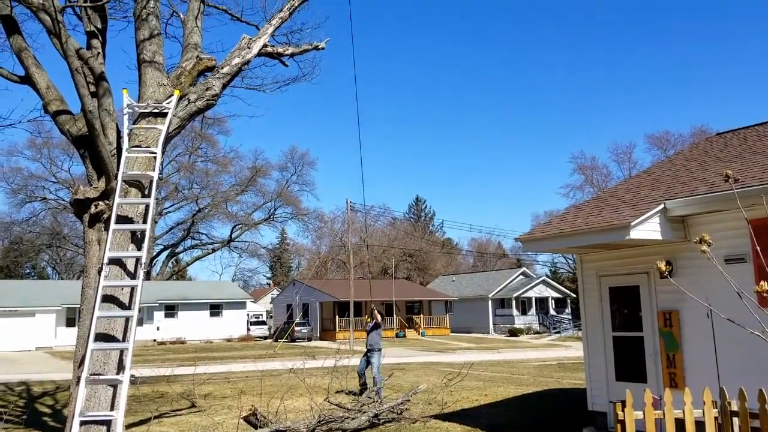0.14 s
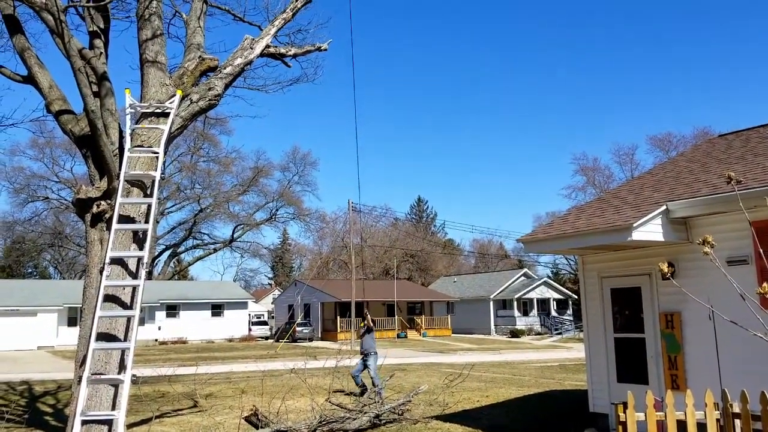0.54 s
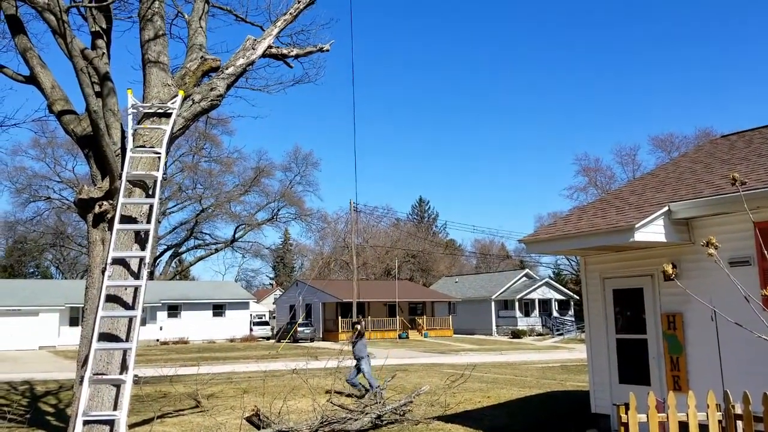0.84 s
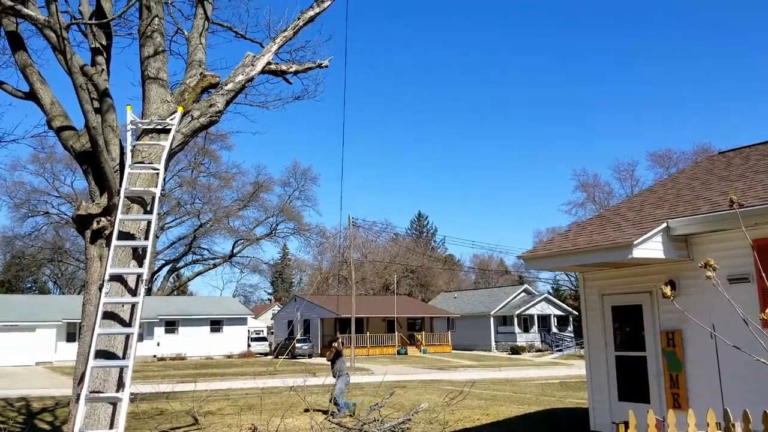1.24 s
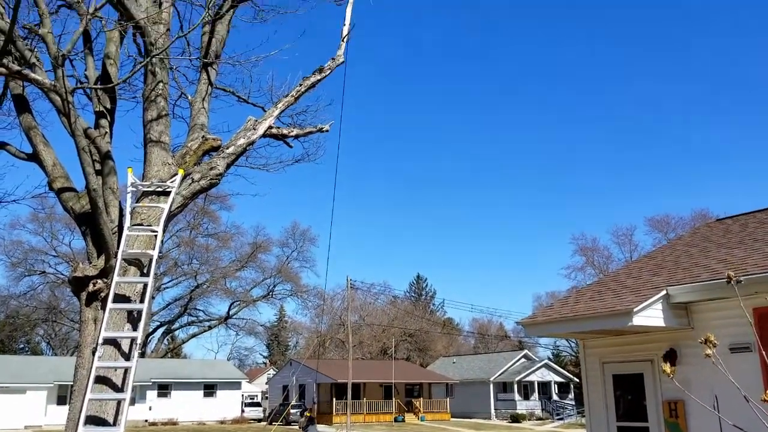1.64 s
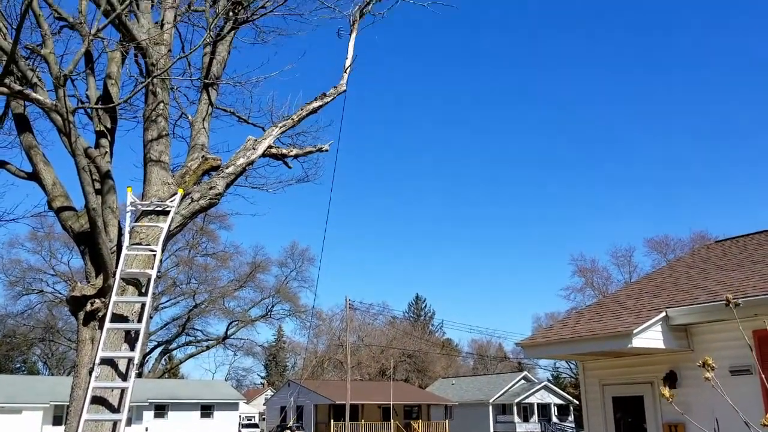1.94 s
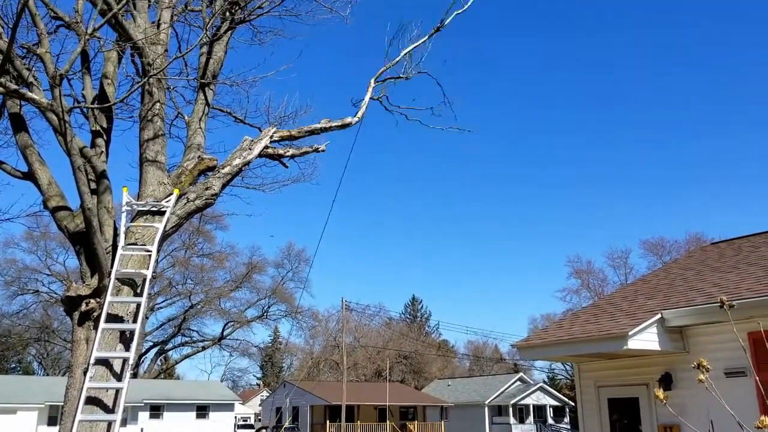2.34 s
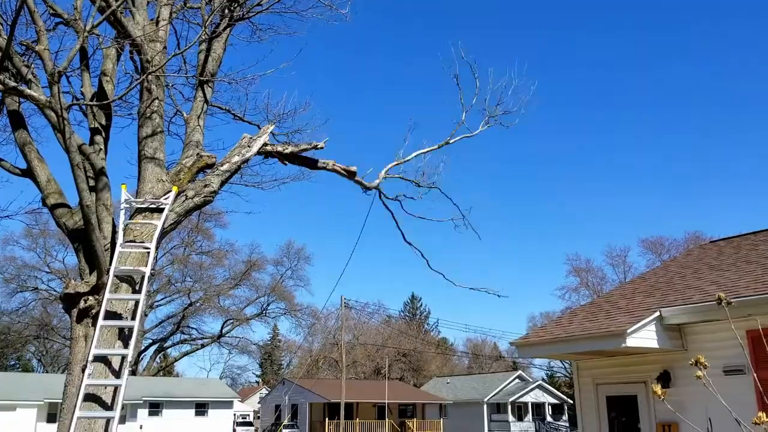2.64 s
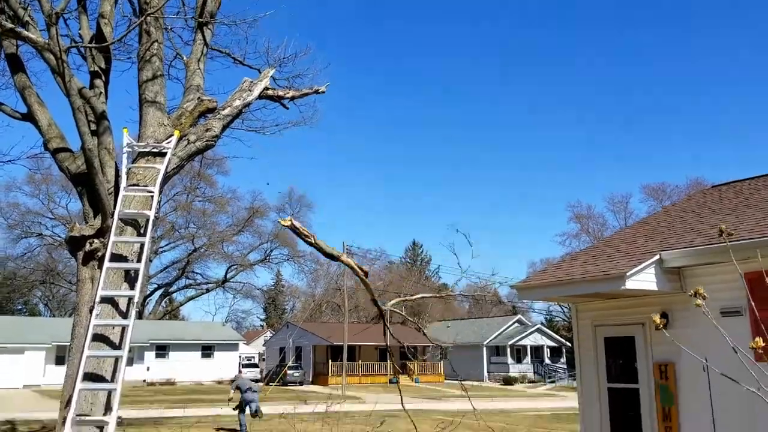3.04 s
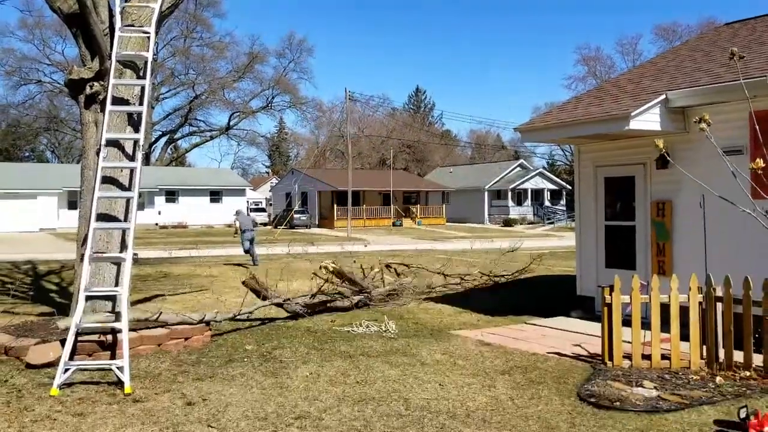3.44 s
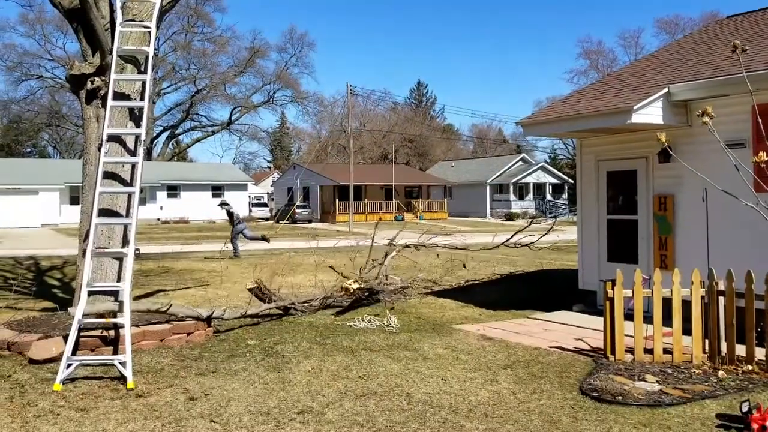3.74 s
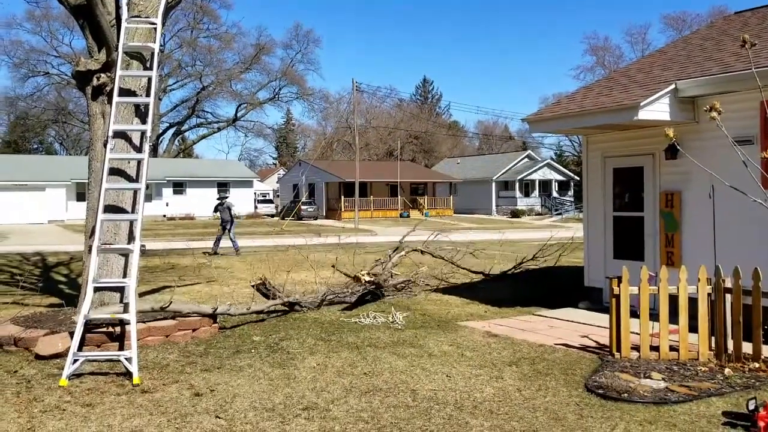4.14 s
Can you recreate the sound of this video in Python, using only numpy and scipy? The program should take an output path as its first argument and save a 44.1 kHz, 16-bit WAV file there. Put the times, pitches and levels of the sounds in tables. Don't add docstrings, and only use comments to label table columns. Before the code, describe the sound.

A stereo phone recording in an open, breezy yard. A hoarse jay calls faintly at the start over distant street noise, hiss, a far small engine idling and low wind buffets. From about 0.5 seconds thick wood cracks to the left, with sharp splintering bursts near 0.6, 0.75 and 0.9 and smaller cracks until 1.1. A lull follows, then the limb snaps off hard at 1.85, bright and ringing, with short reflections from the crown and yard. From 2 to 3 seconds it falls with sparse twig clicks and light rustle; the jay calls again more faintly near 2.65 and a small bird whistles softly around 2.8 to 3.0. At 3.1 it crashes onto the lawn: dense hollow knocks, shattering twigs and scraping brush, loudest until 3.5. Rebounding knocks and a tiny woody squeak come around 3.8 to 4.0, then scattered ticks as wind rises towards the end at 4.3.

```python
import sys
import numpy as np
from scipy import signal
from scipy.fft import rfft, irfft
from scipy.io import wavfile
from scipy.ndimage import uniform_filter1d

SR = 44100
rng = np.random.default_rng(int(sys.argv[2]) if len(sys.argv) > 2 else 0)


def dump_mix(stems):
    frames = np.atleast_2d(stems).T
    limited = np.clip(frames, -1, 1)
    pcm = np.round(limited * 32767).astype(np.int16)
    wavfile.write(sys.argv[1], SR, pcm)


def natural_amplitude(level_db):
    exponent = np.asarray(level_db, float) / 20
    return 10 ** exponent


N = 189674
LEFT_RIGHT = np.array([[1], [-1]])
LIMB_PAN_DB, LANDING_S = -3.5, 3.05

# (time [s],
# peak level [dB], ring pitch [Hz], splinters over ring [dB], thud over ring [dB])
CROWN_KNOCKS = [(0.488, -26.5, 658, -3, -24.5), (0.589, -36, 700, -3, -3), (0.6185, -11.5, 648, -3, -20.5),
                (0.7555, -11.5, 652, -8.5, -11), (0.769, -26.5, 550, -17, 1), (0.8955, -4, 613, -4.5, -7.5),
                (0.982, -21, 1080, -7.5, -28), (1.009, -18.5, 677, -16.5, -20), (1.0225, -22, 1312, 7, -8),
                (1.0773, -34, 460, -8, -0.5), (1.833, -25, 1197, -7.5, -21), (1.859, -6, 640, -6, -28.5),
                (1.884, -15, 635, -3.5, -6), (2.008, -26.5, 712, -7, -19), (2.045, -25, 454, -6.5, -23),
                (2.108, -28.5, 634, -9.5, -14), (2.18, -32, 649, -8, -12), (2.607, -35, 1216, -6, -15),
                (2.648, -44, 660, -2, -12.5)]
# (time [s], peak level [dB], ring pitch [Hz], splinters [dB], thud [dB])
LAWN_BLOWS = [(3.084, -16.5, 528, -20, -31), (3.104, -17, 557, -20, -17), (3.125, -14, 1084, -8.5, -40),
              (3.137, -29, 519, -1, -21), (3.167, -38, 526, 8, -20), (3.215, -8.5, 632, -6.5, -46),
              (3.229, -15.5, 713, -4, -27), (3.248, -32, 708, -3, -14), (3.277, 0.5, 773, -26, -18),
              (3.296, -16, 329.4, -18, -39), (3.337, -19, 661, -7.5, -22), (3.366, -14.5, 685, -11, -10),
              (3.381, -4, 319.8, -18, -35), (3.402, -10.5, 422, -13.5, -7), (3.452, -11, 843, -33, -6),
              (3.468, -16, 336, -22, -21), (3.485, -27.5, 253.5, -13, -12), (3.518, -48, 845, -19, -10),
              (3.605, -28, 285, -5.5, -2.5)]
# (time [s], peak level [dB], ring pitch [Hz], splinters [dB], thud [dB])
REBOUNDS = [(3.732, -31.5, 720, -13, -11), (3.801, -22, 254, -20, 0), (3.828, -22, 730, -25, 1.5),
            (3.848, -30, 372, -22, -3), (3.889, -19, 333, -25, -33), (3.899, -11, 494, -23, -34),
            (3.917, -17.5, 322, -18, -32), (3.941, -18.5, 517, -21, -34), (3.962, -23.5, 498, -17.5, -7),
            (3.988, -34.5, 483, -7.5, -20), (4.088, -36, 924, -10.5, -16), (4.256, -35, 316, -16, -21.5)]
# (time [s], peak level [dB], ring pitch [Hz], splinters [dB], thud [dB])
SECOND_PIECES = [
    (1.860, -14, 560, -25, -34),
    (3.801, -18.5, 784, -26, -34),
    (4.259, -30.5, 740, -19, -28),
    (1.9, -41, 1580, 3, -27.5),
    (3.893, -15, 752, -16, -28),
]
TEAR_CYCLES = 2.6
LEAD_CYCLES = 2.6

# (time [s], peak level [dB], pitch [Hz], T60 [s], left minus right [dB])
CLEAR_RINGS = [(1.8593, -7, 425, .07, -3.5), (1.8593, -4, 600, .055, -4), (1.8593, -11, 1050, .035, -3.5),
               (1.8593, -10, 1750, 0.043, -4), (1.865, -16.5, 1270, 0.048, -3),
               (1.8664, -10, 425, .035, -4), (1.864, -20, 2336, .036, -3.5),
               (1.8845, -22.5, 1220, .04, -3.5), (1.8245, -24, 1100, .007, -4),
               (1.8343, -6, 1250, .006, -3.5), (.9835, -7, 1150, .007, -3.5), (.978, -30, 2000, .03, -3),
               (1.0243, -17, 4300, .01, -4), (1.029, -13, 1500, .01, -3.5), (1.0772, -17, 1600, .007, -3),
               (0.8955, -12.5, 400, .06, -3.5), (0.8955, -14.5, 210, 0.067, -3),
               (1.942, -32.5, 2100, .04, -2), (2.652, -39, 1720, 0.02, -4), (2.733, -49, 1750, 0.027, -2),
               (3.28, -18, 780, 0.037, -3), (3.801, -27.5, 1150, .05, -3), (3.892, -25.5, 1150, .04, -3),
               (3.905, -36, 2400, 0.07, -3), (3.9, -41, 3500, .06, -3), (3.943, -28, 2500, 0.017, -7),
               (3.9895, -30, 2570, .015, -3), (3.958, -37, 4350, .02, -5), (4.256, -32.5, 1000, .03, -3),
               (1.0243, -1, 1450, .007, -3.5), (1.0246, -7, 2500, .008, -3.5),
               (1.8343, -23.5, 430, 0.037, -4.5), (1.8845, -22, 620, 0.043, -3.5),
               (1.868, -18, 800, .05, -3.5), (1.8845, -25.5, 2650, .04, -3), (.6715, -31, 3200, .012, -2.5),
               (.7, -31, 2200, .015, -2), (3.0902, -12, 4800, .012, -7.5), (3.17, -23, 2450, 0.042, -5)]

# (time [s], peak level [dB], ring pitch [Hz], left minus right [dB])
CUT_FIBRES = [(0.4854, -38.5, 3400, -18), (0.4902, -20.5, 3130, -9.5), (0.5467, -41, 2960, -8),
              (0.5867, -27, 3700, -7), (0.6195, -10, 2760, -5), (0.6715, -33, 3280, 2),
              (0.7555, -17, 2700, -7), (0.7709, -24, 4000, -16), (0.8978, 0, 2820, -6),
              (0.9464, -20, 2980, 3), (0.9834, -15, 2750, -3.5), (1.0005, -26.5, 2740, -2.5),
              (1.0244, -9, 2690, -7.5), (1.078, -24, 2390, -2.5), (1.2758, -45, 2376, -15.5),
              (1.7111, -50, 11700, -19.5), (1.8248, -22, 4520, -13), (1.8338, -17, 11180, -13.5),
              (1.8599, -0.5, 3300, -8), (1.8862, -4, 4630, -5.5), (1.9375, -30, 2315, -1),
              (1.9785, -30, 2750, 0)]
# (time [s], peak level [dB], ring pitch
# [Hz], left minus right [dB])
FALLING_AND_LATE_TWIGS = [(2.0502, -43, 2890, 2), (2.088, -42.5, 4640, 12), (2.1273, -38.5, 2630, -5),
                          (2.1887, -32, 11000, -5), (2.3545, -47.5, 3720, -12), (2.3711, -34, 3160, -6),
                          (2.4264, -37.5, 6600, -14.5), (2.4706, -42.5, 2646, -14), (2.4962, -34.5, 2550, -14),
                          (2.5337, -48, 5630, -16), (2.61, -38, 2640, -9), (2.6479, -29, 11200, -5),
                          (2.7322, -36.5, 11900, -13), (2.945, -40.5, 2560, -9), (2.972, -43, 3750, -6),
                          (2.9811, -39, 3750, -8.5), (3.0435, -48, 7900, -14), (3.0652, -46, 3120, -6.5),
                          (4.0264, -57, 2860, -4), (4.0711, -43, 2660, -15), (4.1006, -41.5, 2650, -17),
                          (4.153, -35.5, 7000, -25), (4.1649, -30, 10300, -6), (4.2332, -34, 3550, -14),
                          (4.2755, -34.5, 4900, -10)]
# (time [s], peak level [dB], ring pitch [Hz], left minus right [dB])
SHATTERED_TWIGS = [(3.0901, -0.5, 3300, -7), (3.1288, -8.5, 2900, -12), (3.1532, -17.5, 4300, -12),
                   (3.1697, -16.5, 2570, -4.0), (3.1971, -26.5, 3000, -13), (3.2215, -14, 5100, -19),
                   (3.2794, -17, 2450, -12.5), (3.3054, -20, 5000, -26), (3.3223, -11.5, 5570, -8),
                   (3.3394, -22.5, 3030, -24), (3.3654, -26, 2800, -18), (3.3913, -1, 5000, -5.5),
                   (3.4256, -11, 4800, -7), (3.4361, -12, 4930, -16), (3.478, -29.5, 3610, -28),
                   (3.496, -19.5, 2840, -14), (3.5503, -16.5, 11300, -5), (3.5564, -18, 4530, -6.5),
                   (3.5843, -23, 10600, -4), (3.6047, -29, 2980, -26), (3.6514, -39, 2500, -3.0),
                   (3.699, -23.5, 4100, -8), (3.7434, -35, 9200, -21), (3.7903, -32, 11900, -1.5),
                   (3.8028, -15, 9800, -16.5), (3.8332, -19.5, 5200, -7), (3.8781, -39, 2750, -7),
                   (3.9065, -32, 5330, -17), (3.9434, -40, 2590, -11), (3.9888, -41, 2400, -1)]
# (time [s], peak level [dB], centre [Hz], left minus right [dB])
TWIG_TICKS = [(3.212, -24, 3200, -10), (3.217, -24, 5000, -8), (3.2245, -20, 8500, -8),
              (3.233, -19.5, 5300, -8), (3.237, -17.5, 3000, -8), (3.2385, -18, 7500, -11),
              (3.242, -22, 10500, -4), (3.252, -21, 12000, -4), (3.259, -22.5, 8500, -6),
              (3.2595, -24.5, 5500, -6), (3.281, -24, 9000, -5), (3.302, -24, 9500, -5),
              (3.305, -23.5, 12500, -4), (3.368, -24, 11500, -4), (3.385, -22, 11000, -4),
              (3.402, -20.5, 4000, -6), (3.407, -19, 12000, -4), (3.408, -20.5, 8500, -5),
              (3.444, -17, 12500, -4), (3.449, -23, 9500, -5), (3.455, -22, 12000, -4),
              (3.4795, -22, 12000, -4.5), (3.4805, -27.5, 2520, -6), (3.4905, -27, 11500, -4),
              (3.497, -22, 12500, -4), (3.498, -25.5, 2000, -5), (3.512, -26, 10500, -6),
              (3.513, -28, 5500, -5), (3.527, -30, 8050, -5), (3.54, -35, 8000, -5),
              (3.568, -33, 11000, -5), (3.58, -36, 9000, -4), (3.803, -23, 5520, -8),
              (3.912, -31, 5420, -11), (3.927, -31, 5300, -10), (.951, -35, 9500, -2),
              (1.003, -32, 12000, -2.5), (1.011, -29, 1900, -4), (1.861, -15, 8500, -1.5),
              (3.426, -17, 11500, -4), (3.551, -24, 11980, -4), (3.586, -28, 12000, -4),
              (3.712, -40, 10500, -4), (3.851, -35, 12000, -3), (3.904, -34.5, 10990, -3),
              (3.915, -35, 9500, -3), (1.8875, -21, 8500, -1.5), (3.941, -40, 11500, -3),
              (4.086, -43, 5170, -8), (4.165, -36, 8500, -5)]
TICK_S, TICK_SPREAD = .0016, .11

# (time [s], level [dB])
RUBBING = [
    [(1.9, -50), (2.03, -52.5), (2.22, -60.5), (2.7, -62.5), (3.05, -84)],
    [(3.05, -70), (3.14, -47), (3.26, -30.5), (3.45, -30.5), (3.59, -47.5), (3.8, -49.5), (4.3, -59)],
]
HARD_DB, THICK_SHARE, TWIG_SHARE = -33.5, 1, 1.29
CLUMP_DB = 3.8
# (time [s], level [dB])
SQUEAK = [
    (3.895, -59),
    (3.905, -44.5),
    (3.94, -45),
    (3.975, -71),
]
SQUEAK_HZ = 5330
# (time [s], length [s], level [dB], lowest [Hz], highest [Hz])
DRAGS = [
    (2.6, .07, -50, 500, 3600),
    (3.058, .025, -47, 1500, 14000),
    (3.078, .014, -38, 1000, 6000),
    (1.706, .03, -58, 3500, 14000),
    (2.08, .025, -52, 11500, 15500),
    (2.12, .04, -50, 900, 3500),
    (3.101, .013, -33, 6000, 14500),
    (3.338, .03, -31, 1200, 14500),
    (3.203, .022, -36, 2500, 14500),
]

CROWN_T60_S, CROWN_DB = (0.17, 0.061, 0.033), (-9, -3.5, -3.5)
YARD_T60_S, YARD_DB = (1.0, 0.92, 0.7), (-21, -17, -15.5)
GRAIN_DB = 2.5
WANDER_RAD, WANDER_PER_S = 1.6, 500

# (multiple of the missing fundamental, level [dB], strongest at [s])
JAY_PARTIALS = [(2, -10, .17), (3, -3, .22), (4, 0, .1), (5, -15, .25), (7, -10, .2), (8, -10, .22),
                (10, -27, .08)]
JAY_S, JAY_ATTACK_S, JAY_HOLD_S = 0.006, .045, 0.18
JAY_DB, JAY_FADE_DB_PER_S = -58.5, 68
JAY_FOURTH_HZ, JAY_SAG_HZ_PER_S2 = 3530, 4200
JAY_AGAIN_S, JAY_AGAIN_DB, JAY_AGAIN_PITCH = 2.64, -10, .975
# (time [s], length [s], pitch [Hz], level [dB])
SMALL_BIRD = [
    (2.798, .04, 2050, -61),
    (2.975, .05, 2000, -61),
    (3.035, .025, 2060, -62),
]

# (centre [Hz], width [Hz], level [dB])
MUFFLER = [(100, 40, -25), (279, 48, 13), (474.8, 17, 4), (526, 140, 7), (723, 20, -3)]
IDLE_HZ, IDLE_FIRST_S, IDLE_DB = 24.22, .014, -54

# (time [s], level [dB], left minus right [dB])
WIND = [(0.0, -50.5, 34.0), (0.13, -47, 40.0), (0.23, -48, 9), (0.42, -49, 31.0), (0.5, -40.5, 1),
        (0.55, -46.5, 14), (0.79, -44, 2), (1.09, -37.5, 20), (1.18, -42.5, 10.5), (1.54, -54, 33),
        (1.84, -52.5, 7.5), (2.65, -52.5, 6.5), (2.74, -56, 32), (2.98, -47, 2.5), (3.93, -40.5, 2.5),
        (4.01, -49.5, 28), (4.19, -37, -7.5), (4.3, -35, 23)]
# (time [s], peak level [dB], swing [Hz], left minus right [dB])
BUFFETS = [(.81, -23.5, 85.7, 2), (.872, -31, 87, -1), (1.052, -29, 100, 15), (1.066, -24, 110, 8),
           (1.201, -30, 80.5, 4), (1.741, -36.5, 80, 7.5), (2.199, -33.5, 90, -2), (2.629, -35, 70, 3),
           (3.001, -31.5, 95.65, 0), (3.633, -21.5, 140, 7), (4.061, -35, 91.5, 13), (4.207, -27, 69, 0),
           (4.225, -24.5, 85.4, -2)]
BUFFET_CYCLES = 0.68

# (frequency [Hz], density [dB per Hz])
AIR_COLOUR = [(71, -20.5), (120, -49), (213, -60), (284, -12.5), (348, -7.5), (473, -3.5), (988, -31),
              (2530, -26), (6630, -29.5), (8310, -47), (12500, -31.5), (16000, -33.5)]
AIR_DB = -56


def unit(x):
    return x / np.sqrt(np.mean(x ** 2))


def band(x, lo_hz, hi_hz):
    return signal.sosfilt(signal.butter(2, [lo_hz, min(hi_hz, .45 * SR)], "band", fs=SR, output="sos"), x)


def curves(table):
    s, *columns = np.transpose(table)
    return [np.interp(np.arange(N) / SR, s, c) for c in columns]


def walk(rate):
    k = int(SR / rate)
    held = np.repeat(rng.standard_normal(N // k + 1), k)
    return 1.3 * uniform_filter1d(uniform_filter1d(held, k), k)[:N]


def sides(pan_db):
    return natural_amplitude(np.array([pan_db, -pan_db]) / 2)


def add(out, sound, s, pan_db):
    i = int(s * SR)
    out[:, i:i + sound.shape[-1]] += sides(pan_db)[:, None] * sound[..., :N - i]


def knocks():
    out = np.zeros((2, N))
    for s, db, hz, splinter_db, thud_db in CROWN_KNOCKS + LAWN_BLOWS + REBOUNDS + SECOND_PIECES:
        length_s = TEAR_CYCLES / hz
        place = rng.random(26)
        volley = tear(rng.random(1024), length_s / 2, scatter_db=4.0)
        body = wood(volley, 0.918 * hz, 1.064 * hz, 13.6, place[:2])
        body += 0.81 * wood(volley, .5 * hz, 2.163 * hz, 21.2, place[2:11])
        splinters = wood(volley, 1026, 4575, 16.5, place[11:22])
        thud = wood(volley, 192.0, 458, 2.5, place[22:])
        knock = natural_amplitude(db - 5.0) * body + natural_amplitude(db + splinter_db + 5.5) * splinters
        add(out, natural_amplitude(db + thud_db - 1.0) * thud, s - .0035, LIMB_PAN_DB / 2)
        add(out, knock, s + .0032 - LEAD_CYCLES / hz, LIMB_PAN_DB)
    return out


def tear(chance, length_s, scatter_db):
    t = np.arange(len(chance)) / SR / max(length_s, .001)
    sizes = natural_amplitude(-scatter_db * np.log(abs(2 * chance - 1) + 1e-9))
    volley = rfft(np.sign(chance - .5) * sizes * t * np.exp(-t), 4096)
    return volley / uniform_filter1d(abs(volley), size=15)


def wood(volley, lo_hz, hi_hz, cycles, place):
    step = np.arange(len(place))
    hz = lo_hz * (hi_hz / lo_hz) ** ((step + place) / len(place))
    t = np.arange(2048) / SR
    decay = np.exp(-np.log(1000) * t * hz[:, None] / cycles)
    modes = decay * np.sin(2 * np.pi * hz[:, None] * t)
    ladder = (-1.) ** step @ modes
    sound = band(irfft(volley * rfft(ladder, 4096)), 0.77 * lo_hz, 1.62 * hi_hz)
    fade = np.cos(np.arange(3072) * np.pi / 6144)
    return sound[:3072] * fade / abs(sound).max()


def rings():
    out, t = np.zeros((2, N)), np.arange(4096) / SR
    for s, db, hz, t60, pan_db in CLEAR_RINGS:
        level = natural_amplitude(db - 60 * t / max(t60, .004)) * np.clip(t * hz, 0, 1)
        add(out, level * np.sin(2 * np.pi * hz * t), s, pan_db)
    return out


def snaps():
    out, t = np.zeros((2, N)), np.arange(4096) / SR
    fade = np.clip(t / 0.00075, 0, 1) * (np.exp(-t / 0.0011) + 0.084 * np.exp(-t / 0.017))
    for s, db, hz, pan_db in CUT_FIBRES + FALLING_AND_LATE_TWIGS + SHATTERED_TWIGS:
        spray = rng.standard_normal((2, 4096)) * fade
        ring = band(spray[0] * np.exp(-t / 0.004), .84 * hz, 1.16 * hz)
        snap = band(spray[0], 2460, 8600) + 1.48 * ring
        top = 0.64 * band(spray[0] + 0.95 * spray[1] * LEFT_RIGHT, 8060, 13000)
        gain = natural_amplitude(db - 0.5) / abs(snap + top).max()
        top_db = -4.0 if s < LANDING_S and hz < 6000 else 1.5
        add(out, gain * snap, s, pan_db)
        add(out, gain * top * natural_amplitude(top_db), s, 0.13 * pan_db)
    return out


def twig_ticks():
    out, t = np.zeros((2, N)), np.arange(1024) / SR / TICK_S
    for s, db, hz, pan_db in TWIG_TICKS:
        puff = rng.standard_normal((2, 1024)) * t * np.exp(-t)
        puff = puff[0] + min(hz / 14000, 1) * puff[1] * LEFT_RIGHT
        puff = band(puff, hz * (1 - TICK_SPREAD), hz * (1 + TICK_SPREAD))
        add(out, natural_amplitude(db + 2.0) * puff / abs(puff).max(), s - TICK_S, pan_db)
    return out


def rustle():
    small_db, = curves(RUBBING[0] + RUBBING[1][1:])
    thick_db = HARD_DB + THICK_SHARE * (small_db - HARD_DB) + 3.5
    twig_db = HARD_DB + TWIG_SHARE * (small_db - HARD_DB)
    heap = natural_amplitude(thick_db) * grains(490, 0.71, 340, 1070, alike=0.24, tail_s=0.0033)
    heap += natural_amplitude(small_db) * grains(700, 2.2, 920, 3830, alike=0.1, tail_s=0.004)
    heap += natural_amplitude(twig_db - 6.0) * grains(600, 6.0, 3300, 8800, alike=0.16, tail_s=0.0024)
    heap += natural_amplitude(twig_db - 4.0) * grains(490, 3.0, 7800, 14000, alike=0.12, tail_s=0.0046)
    fade_in = np.clip((np.arange(N) / SR - RUBBING[0][0][0]) / .03, 0, 1)
    return heap * natural_amplitude(CLUMP_DB * walk(30.013)) * fade_in


def grains(rate, scatter_db, lo_hz, hi_hz, alike, tail_s):
    sizes = natural_amplitude(scatter_db * np.minimum(rng.exponential(size=N), 4))
    hits = (rng.random(N) < rate / SR) * sizes
    envelope = signal.lfilter([1], [1, -np.exp(-1 / (tail_s * SR))], hits)
    mid, side = envelope * rng.standard_normal((2, N))
    share = np.clip(alike, 0, 1)
    return unit(band(np.sqrt(1 + share) * mid + np.sqrt(1 - share) * side * LEFT_RIGHT, lo_hz, hi_hz))


def squeak():
    level = natural_amplitude(curves(SQUEAK)[0] + 2.3 * walk(120))
    tone = unit(band(rng.standard_normal(N), .96 * SQUEAK_HZ, 1.04 * SQUEAK_HZ))
    return level * tone * (abs(np.arange(N) / SR - SQUEAK[2][0]) < .05)


def scrapes():
    out = np.zeros((2, N))
    for s, length_s, db, lo_hz, hi_hz in DRAGS:
        t = np.arange(4096) / SR / length_s
        mid, side, lumps = rng.standard_normal((3, 4096))
        clumps = natural_amplitude(5.0 * unit(uniform_filter1d(lumps, size=60)))
        crackle = unit(band(clumps * (mid + .4 * side * LEFT_RIGHT), lo_hz, hi_hz))
        add(out, natural_amplitude(db) * crackle * np.sin(np.pi * np.clip(t, 0, 1)), s, LIMB_PAN_DB)
    return out


def lag(x, samples):
    turn = np.exp(2j * np.pi * np.fft.rfftfreq(N) * samples / 2 * LEFT_RIGHT)
    return irfft(rfft(x) * turn, N)


def scatter(x, t60s, dbs, alike):
    t, answer = np.arange(SR) / SR, 0
    mid, side = rng.standard_normal((2, SR))
    groups = natural_amplitude(GRAIN_DB * unit(uniform_filter1d(mid[::-1], size=260)))
    noise = (mid + np.clip(1 - alike, 0, 1) * side * LEFT_RIGHT) * unit(groups)
    for (lo, hi), t60, db in zip([(200, 870), (850, 4400), (4000, 45000)], t60s, dbs):
        tail = band(noise, lo, hi) * np.exp(-np.log(1000) * t / t60) * np.clip(t / 0.0084, 0, 1)
        answer = answer + natural_amplitude(db) * tail / np.sqrt(t60 * SR / 14)
    return signal.fftconvolve(x, answer, axes=1)[:, :N]


def jay():
    t = np.clip(np.arange(N) / SR - JAY_S, 0, .6)
    fourth_hz = JAY_FOURTH_HZ - JAY_SAG_HZ_PER_S2 * (t - .08) ** 2
    phase = 2 * np.pi * np.cumsum(fourth_hz / 4 * (1 + .012 * walk(400))) / SR
    call = np.zeros(N)
    for multiple, db, peak_s in JAY_PARTIALS:
        hoarse_db = 3 * walk(150) + 1.2 * walk(20)
        call += natural_amplitude(db + hoarse_db - 32 * abs(t - peak_s)) * np.sin(multiple * phase)
    fade_s = np.maximum(t - JAY_ATTACK_S - JAY_HOLD_S, 0)
    call *= np.clip(t / JAY_ATTACK_S, 0, 1) * natural_amplitude(JAY_DB - JAY_FADE_DB_PER_S * fade_s)
    call *= np.clip((.45 - t) / 0.028, 0, 1)
    n = np.arange(N)
    again = np.interp((n - JAY_AGAIN_S * SR) * JAY_AGAIN_PITCH, n, call, left=0)
    return np.tile(call + natural_amplitude(JAY_AGAIN_DB) * again, (2, 1))


def small_bird():
    out = np.zeros((2, N))
    for s, length_s, hz, db in SMALL_BIRD:
        arch = np.hanning(int(length_s * SR))
        phase = 2 * np.pi * np.cumsum(hz * (.98 + .03 * arch)) / SR
        add(out, natural_amplitude(db) * arch * np.sin(phase), s, 0.)
    return out


def idle():
    turns = IDLE_HZ * (np.arange(N) / SR - IDLE_FIRST_S)
    puffs = np.append(0, np.diff(np.floor(turns))) * natural_amplitude(1.1 * rng.standard_normal(N))
    puffs += 0.073 * np.exp(-(turns % 1) / 0.2) * rng.standard_normal(N)
    exhaust = sum(natural_amplitude(db) * unit(band(puffs, hz - width / 2, hz + width / 2)) for hz, width, db in MUFFLER)
    return natural_amplitude(IDLE_DB - 1.0) * unit(exhaust)


def wind():
    db, pan_db = curves(WIND)
    eddies = rng.standard_normal((3, 2, N)) * natural_amplitude(2.5 * np.array([walk(30), walk(30)]))
    rumble = natural_amplitude(-9.5) * unit(band(eddies[0], 25, 50))
    rumble += unit(band(eddies[1], 50, 94.4))
    rumble += natural_amplitude(-5) * unit(band(eddies[2], 47, 200))
    return rumble * natural_amplitude(db + 1.5) * sides(np.clip(pan_db, -8, 8))


def buffets():
    out, t = np.zeros((2, N)), np.arange(-2048, 2048) / SR
    for s, db, hz, pan_db in BUFFETS:
        swing = np.exp(-(t * hz / BUFFET_CYCLES) ** 2) * np.sin(2 * np.pi * hz * t)
        add(out, natural_amplitude(db) * swing, s + t[0], pan_db)
    return out


def air():
    hz = np.fft.rfftfreq(N, 1 / SR) + 1
    colour_hz, colour_db = np.transpose(AIR_COLOUR)
    colour = natural_amplitude(np.interp(np.log(hz), np.log(colour_hz), colour_db))
    mid, side = rfft(rng.standard_normal((2, N))) * colour
    stereo = irfft(mid + np.clip(hz / 2500, .3, 1) * side * LEFT_RIGHT, N)
    return natural_amplitude(AIR_DB + walk(4)) * unit(stereo)


def scene():
    limb, bird = knocks() + snaps() + rings(), jay()
    crown = scatter(limb + bird, CROWN_T60_S, CROWN_DB, alike=0.42)
    yard = scatter(limb + 2 * bird, YARD_T60_S, YARD_DB, alike=0.37)
    down = np.arange(N) / SR > LANDING_S
    direct = lag(limb * ~down, samples=2.95) + lag(limb * down, samples=-1.27)
    branches = direct + crown + twig_ticks() + rustle() + squeak() + scrapes()
    background = bird + small_bird() + idle() + wind() + buffets() + air()
    wandering = np.real(signal.hilbert(yard) * np.exp(1j * WANDER_RAD * walk(WANDER_PER_S)))
    return branches + background + wandering


def top_cut(x):
    return signal.sosfilt(signal.butter(12, 15950, fs=SR, output="sos"), x)


def record(dry):
    top_hz = 15500
    heard = signal.sosfilt(signal.butter(6, top_hz, fs=SR, output="sos"), dry)
    return top_cut(np.clip(heard, -1, 1))


dry = scene()
out = record(dry)
dump_mix(out)
```